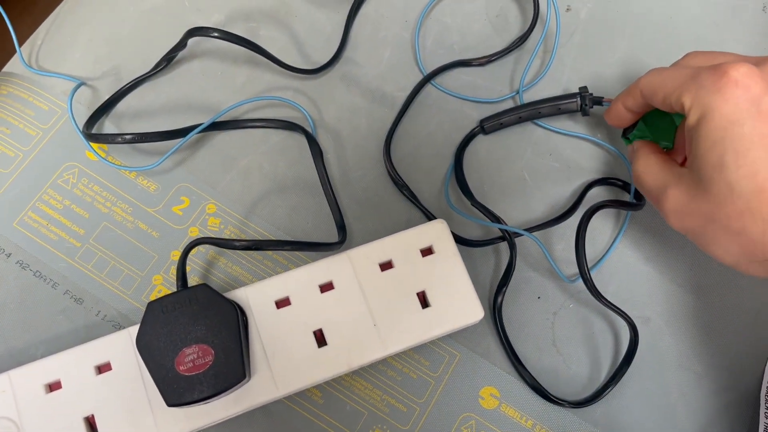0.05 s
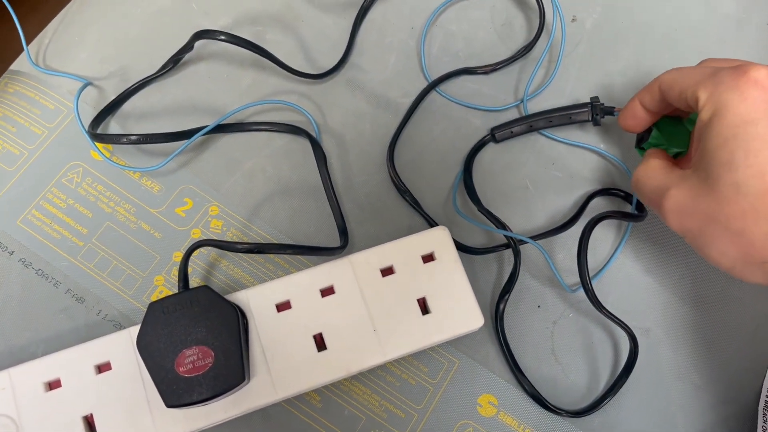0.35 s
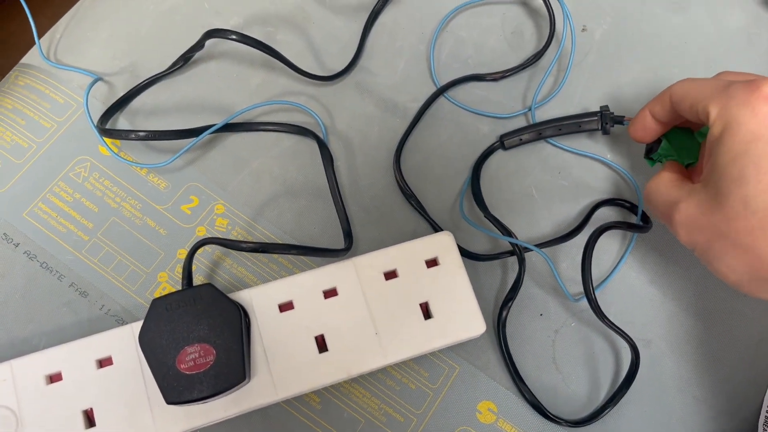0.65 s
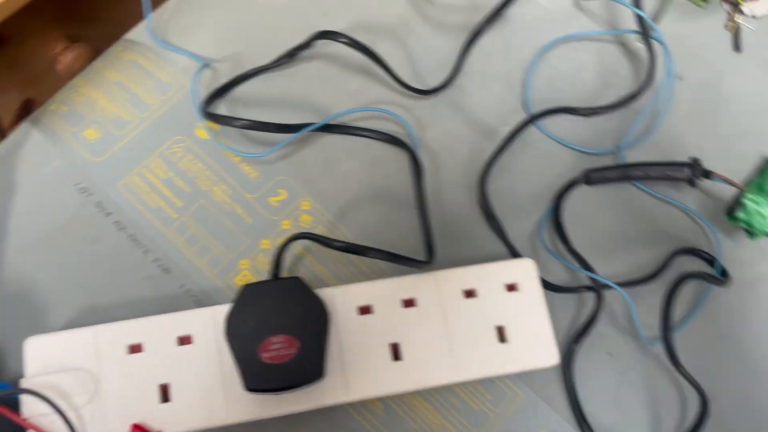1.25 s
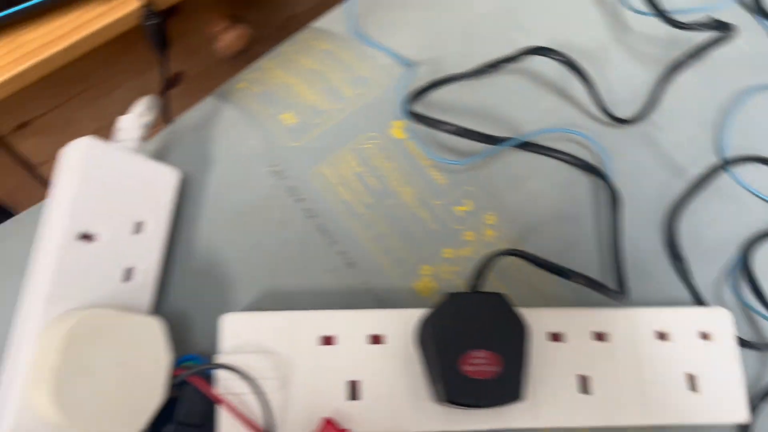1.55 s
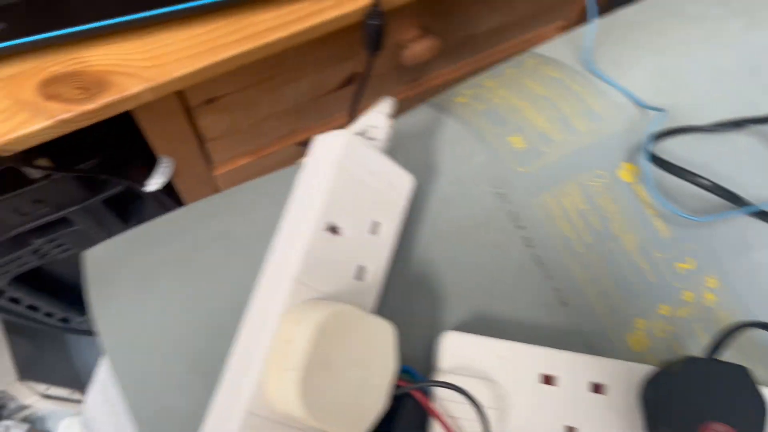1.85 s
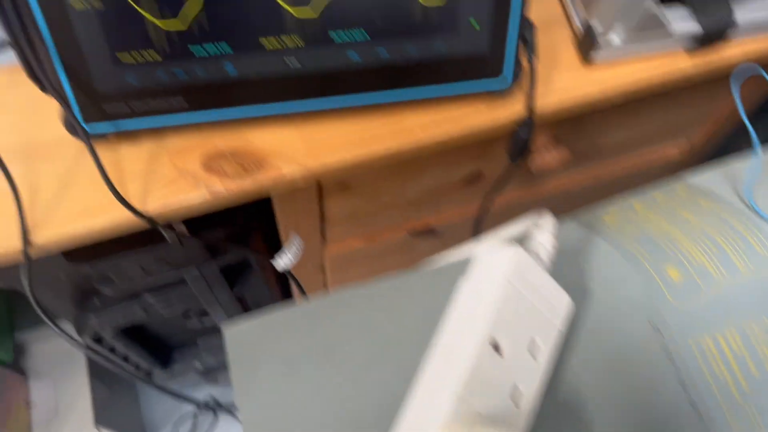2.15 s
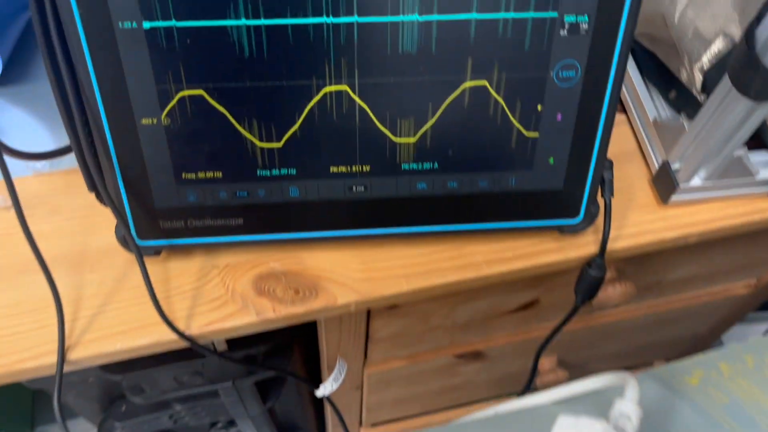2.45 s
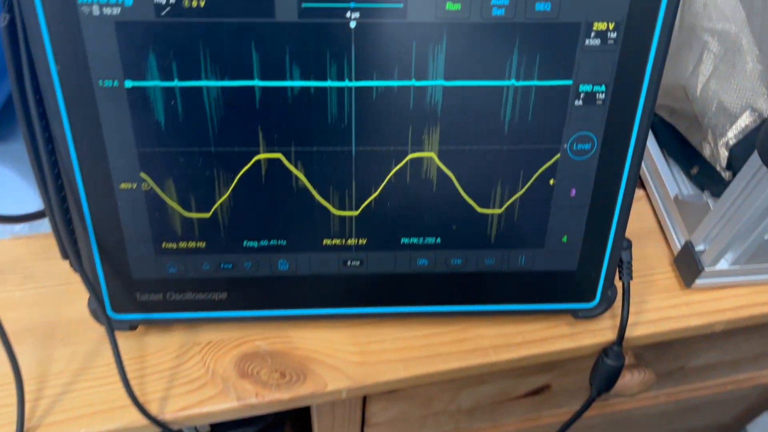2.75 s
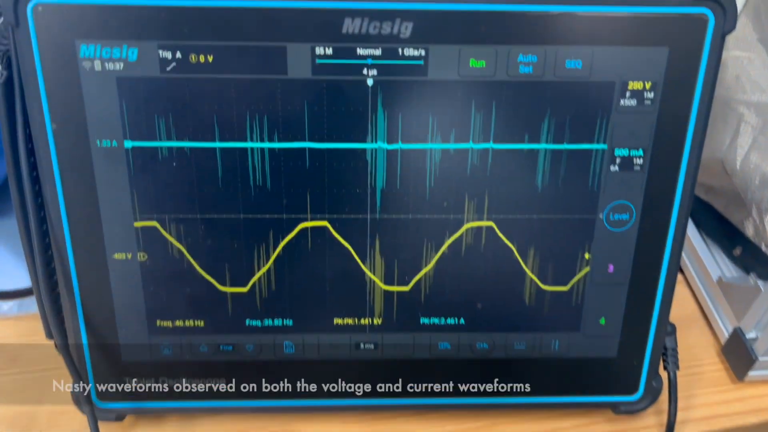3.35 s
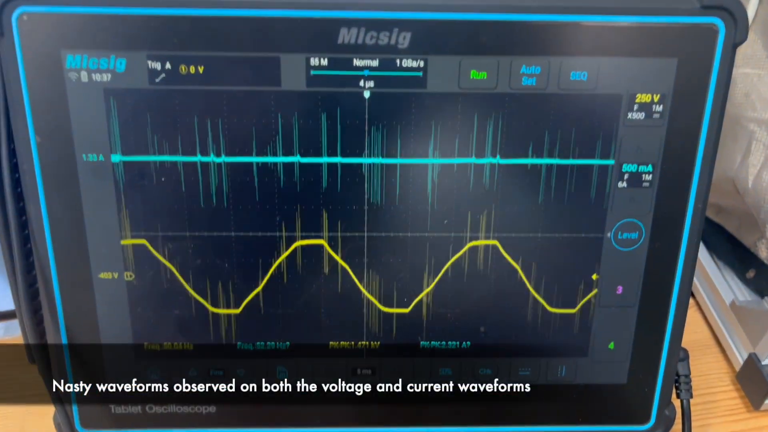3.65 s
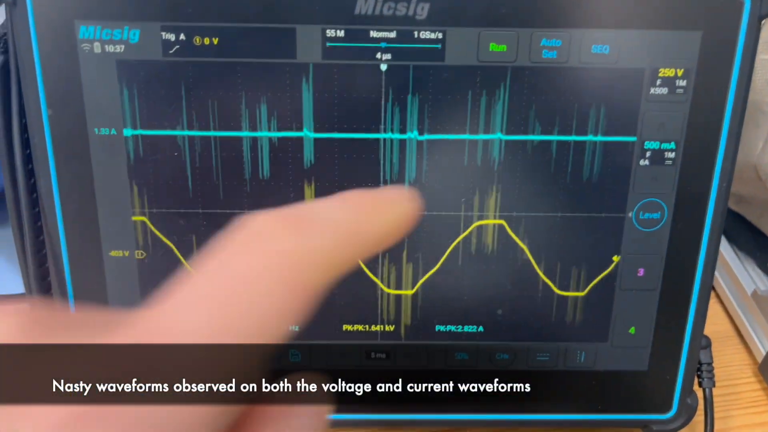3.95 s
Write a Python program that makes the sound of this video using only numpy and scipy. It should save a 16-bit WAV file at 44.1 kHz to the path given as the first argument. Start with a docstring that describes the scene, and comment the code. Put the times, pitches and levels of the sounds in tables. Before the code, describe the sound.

A small relay starts chattering at about 0.5 seconds and continues to the end at 4 seconds: a harsh, rapid buzz of uneven clacks, metallic ringing and high spark crackle. A fan whirs faintly in the small room throughout. A soft low hum and rumble swell around 1 second. The hand-held microphone gets a few barely audible taps, then one clear knock at about 3.5 seconds.

```python
"""A fan whirs faintly in a small room. Then a small mains relay starts to chatter on a workbench:
a hundred times a second its armature (the moving arm) strikes with uneven force and bounces,
clacking in the case and ringing the steel, while the contacts spit sparks. The coil hums over a
low rumble. A hand-held camera takes a light tap, swings away, then gets two more taps and one
clear knock."""
import sys
import numpy as np
from scipy import signal
from scipy.fft import rfft, irfft, next_fast_len
from scipy.io import wavfile
from scipy.ndimage import uniform_filter1d, map_coordinates

SR = 44100
rng = np.random.default_rng(int(sys.argv[2]) if len(sys.argv) > 2 else 0)


def store_pcm(level_fs):
    """Save levels as 16-bit WAV."""
    pcm = np.round(np.clip(level_fs, -1, 1) * 32767).astype(np.int16)
    wavfile.write(sys.argv[1], SR, np.atleast_2d(pcm).T)


N = 176400

# How loud the fan is. Each row: time in seconds, air noise in dB, blade tone in dB.
FAN_LEVELS = [(0, -58, -66.5), (.45, -57.5, -67.5), (1.1, -56.5, -65), (1.45, -59, -62.5),
              (2.2, -55, -62.5), (3.3, -51, -60), (3.65, -59.5, -65.5), (4, -59, -72.5)]
# The air noise's colour (its mix of low and high). Each row: frequency in Hz, relative level in dB.
AIR_TONE = [(25, -26), (55, -25), (90, -26), (230, -10.5), (340, -2.5), (480, 4), (570, -6.5), (680, -10.5),
            (860, -14), (1500, -19.5), (2500, -26.5), (4000, -34), (7000, -49), (15000, -61)]
# How loud the low sounds are. Each row: time in seconds, hum in dB, rumble in dB.
LOW_LEVELS = [(0, -103, -70), (.46, -110, -63.5), (.52, -81, -59), (.8, -62, -60.5), (1.15, -59.5, -54),
              (1.5, -66, -70), (2.2, -68.5, -78), (3.1, -64.5, -70), (3.4, -71.5, -80), (4, -70.5, -84)]
# The rumble's colour. Each row: frequency in Hz, relative level in dB.
RUMBLE_TONE = [(20, -30), (55, -6), (110, -2.5), (170, -6.5), (270, 2), (400, -4.5), (800, -38)]
# The tones in the coil's hum. Each row: frequency in Hz, relative level in dB.
HUM_TONES = [(100, -1), (200, -12), (300, 1)]
# Strikes set one by one. Each row: start in seconds, spark strength in dB, blow strength in dB.
SET_STRIKES = [(0.4791, 6.5, -17), (0.4966, 10, 7.3), (0.5265, 9, 5), (0.588, 7, 2.2), (0.598, 7, 6.3),
               (0.638, 7.5, 8), (0.647, 7, 8), (0.6665, 7, 6.5), (0.6868, 2.2, 0.5), (0.7358, 10, 6.5),
               (0.7459, 8, 8), (0.7859, 9, 7.5), (0.797, 6.5, 5), (0.8378, 0, 6), (0.8454, 5.5, 4),
               (0.8561, 5, 8.5), (0.8655, 4.5, 4.9), (0.8953, 3, 8), (0.906, 3, 6), (0.9164, 8, 2.5),
               (0.9565, 2.1, 6), (1.026, 8.5, 4), (1.0552, 8, 5.5), (1.0671, 3, 5.5), (1.097, 3, 4.4),
               (1.118, 5, 4.5), (1.137, 2.4, 3), (1.1467, 4.2, -1), (1.1768, 10.5, 10.5), (1.2264, 10.5, 2),
               (1.2375, 4.3, 6), (1.2572, -7, 3.0), (1.277, 8, 4), (1.306, -2, 1.5), (1.3257, 7.5, 0),
               (1.3373, -6, 1.5), (1.4658, 7, 8.5), (1.478, 2, -3), (1.496, 3, 4), (1.5055, 2, 2),
               (1.516, 10.5, 7.5), (1.5445, 2, -7), (1.566, 5, 7), (1.5961, 6, 4.5), (1.6054, 9, 3),
               (1.6577, 8.5, 5), (1.696, 3.1, 7.5), (1.7372, 8, 1), (1.7761, 10, 7.5), (1.8159, 5, 8),
               (1.8257, 3, 0), (1.8762, 7.4, -1), (1.9073, 7.5, -2), (1.9371, 9, 5), (1.9675, 8, 2),
               (2.0652, 12.5, 7), (2.0866, 7, -4), (2.098, 4, 3), (2.116, 8, -3), (2.1282, -1, -7),
               (2.145, 12, 5), (2.1576, 3.3, 5), (2.2558, 8, 1.8), (2.2658, 6, 6.5), (2.277, 6.2, 5),
               (2.2867, 7, 8), (2.306, 5, 3.1), (2.3259, 5.6, 3.5), (2.3666, 8, 9), (2.3954, 4, 1),
               (2.4064, 5, 5), (2.4168, 1, 9), (2.436, 5, 1), (2.466, 8.7, 8), (2.5058, 9, 3),
               (2.5175, 6, 6), (2.568, 7, 8), (2.5971, 2.8, 7), (2.606, -1, 2), (2.616, 6.5, 3),
               (2.6258, -1, 0), (2.676, 2, 1.5), (2.6957, 10.5, 4), (2.7468, 8, -1), (2.7663, 3, 7),
               (2.8062, 1, 3), (2.818, 3.0, -1), (2.8969, 4, 0.5), (2.9374, 7, 2), (2.9468, 5.5, 5.5),
               (2.958, -6, 3), (2.9776, 4.0, 4), (3.0262, 9, 4.5), (3.0765, 5, 3.1), (3.0873, 8.5, 5),
               (3.1256, 3.4, 5), (3.1373, 6, 2), (3.1669, 4, 2), (3.1773, 2.6, 3.5), (3.2064, 8, -5),
               (3.2172, 6, 3), (3.298, 7, 3), (3.347, 7, 0), (3.3772, 8, 4.5), (3.387, 10, 3),
               (3.396, -5, 7), (3.4165, 14, 2), (3.4272, 13.5, 6), (3.437, 5, 7), (3.4463, 14, 7.5),
               (3.459, 4.1, 5), (3.4774, 7, 6), (3.4875, -5, 6), (3.5767, 8, 5), (3.6065, 6.5, 4),
               (3.6368, 10.5, 5.5), (3.6477, 7.1, 2), (3.6973, 8, 7), (3.7271, 17.5, 8),
               (3.7772, 11.5, 5.5), (3.8067, 7, 4), (3.8461, 6, 9), (3.8758, 7, 6.8), (3.9064, 5.5, 3.5),
               (3.919, 6, 6), (3.9668, 6, 4), (3.978, -2, 8), (3.9968, 11.5, 9)]
# The bounces after a strike. Each row: delay in seconds, its scatter in seconds, relative level in dB.
REBOUNDS = [(.0023, .0005, -2.5), (.0041, .0006, -4.5)]
# How loud the chatter is. Each row: time in seconds, case clack in dB, spark crackle in dB.
CHATTER_LEVELS = [(.48, -42.5, -33.5), (.85, -42.5, -29), (1, -43, -30.5), (1.15, -42, -29.5),
                  (1.35, -40.5, -27.5), (1.55, -42.5, -27.5), (1.8, -44, -30.5), (2, -45, -31.5),
                  (2.12, -43, -33), (2.21, -49, -36), (2.35, -46, -31.5), (2.7, -45.5, -33.5),
                  (3.1, -47.5, -33.5), (3.42, -49, -36), (3.54, -50.5, -37), (3.66, -49, -37),
                  (4, -53.5, -37.5)]
# How loud the frame's clang is. Each row: time in seconds, level in dB.
CLANG_LEVELS = [(.5, -32.5), (1.35, -35), (1.6, -30), (1.82, -28), (2.15, -35), (2.6, -30.5), (3.4, -34),
                (3.7, -32.5), (4, -34)]
# The colours of case, frame and sparks. Each row: frequency in Hz, relative level in dB.
CASE_TONE = [(100, -23.5), (300, -18), (600, -20.5), (820, -19.5), (1000, -7.5), (1170, -0.5), (1450, 0),
             (1900, -2), (2250, 0.5), (2700, -21.5), (5000, -37.5)]
FRAME_TONE = [(1500, -34), (2250, -24), (2450, 2), (2620, 4), (2830, -0.5), (3020, -2), (3700, -4.5),
              (3920, 5.5), (4400, -1), (4750, -8), (5100, 2), (5450, 3), (5900, -2), (6600, -86),
              (8000, -20.5)]
SPARK_TONE = [(2500, -39), (4300, -16.5), (4800, -3), (5300, -17), (6000, -6.5), (6600, -5.5), (7400, -9.5),
              (9000, -10), (10300, -7), (10950, 0), (11220, 1), (11500, -5.5), (12800, -10.5), (14000, -10),
              (15500, -4)]
# The notes the steel rings at. Each row: frequency in Hz, width in Hz.
STEEL_NOTES = [(3220, 122), (3380, 89), (3570, 100), (4265, 102)]
# How strongly they ring. Each row: time in seconds, then a relative level in dB for each note.
STEEL_LEVELS = [(0.5, -41, -37, -40, -35.5), (0.8, -32, -32, -31, -30), (1, -36.5, -35, -37, -32),
                (1.15, -38.5, -29.5, -36.5, -28), (1.3, -33.5, -32.5, -28.5, -32.5),
                (1.5, -34.5, -28, -31, -30.5), (1.65, -31, -45, -33, -35), (1.8, -28, -34.8, -34, -34.5),
                (2, -34.5, -30.5, -40, -28), (2.12, -32, -32.7, -32.5, -27.5), (2.23, -46, -37, -35, -35.5),
                (2.45, -50, -36, -31.5, -31), (2.751, -44, -33, -31.5, -34),
                (2.95, -43, -39.5, -32.5, -31.5), (3.2, -33.5, -34.5, -34.5, -32.5),
                (3.42, -34, -31.5, -38, -31), (3.55, -33.5, -32, -41.5, -39.5),
                (3.72, -32.5, -34, -41, -37), (3.95, -26.5, -28, -46, -40)]
# The room's echo. Each row: frequency in Hz, seconds to fade by 60 dB (called t60).
ROOM_FADE = [(200, 0.25), (3000, 0.23), (8000, 0.32), (15000, 0.048)]
# Knocks on the camera. Each row: start in seconds, tap strength in dB, thud strength in dB.
CAMERA_KNOCKS = [(.495, -58, -54), (2.55, -43, -50), (3.22, -63, -55), (3.4807, -22, -38)]
# The notes of the camera's shell. Each row: frequency in Hz, relative level in dB, t60 in seconds.
SHELL_NOTES = [(740, 1, 0.016), (1120, 6.5, 0.0045), (1520, 11, 0.0059), (376, -5.5, 0.01),
               (2050, -2, 0.013)]
# How the left and right channels differ. Each row: frequency in Hz, left's lead in radians when near
# and when far, left's level over right in dB when near and when far, likeness from 0 to 1.
LEFT_RIGHT = [(500.0, -0.98, -1.43, 1.27, 0.11, 0.79), (900.0, -0.33, -2.07, 0.04, 1.92, 0.73),
              (1400.0, -0.67, -0.81, 1.25, 6.05, 0.9), (2000.0, 0.13, 0.58, -0.69, -0.84, 0.75),
              (2550.0, 2.25, 2.26, -4.21, -0.7, 0.86), (3200.0, 2.54, 1.86, -1.33, -2.34, 0.59),
              (3380.0, 2.72, 4.89, -0.68, -2.09, 0.62), (3580.0, 9.03, 7.61, -1.46, -0.42, 0.84),
              (3900.0, 8.02, 5.77, -1.81, -1.52, 0.71), (4240.0, 7.16, 6.28, -4.56, -2.86, 0.83),
              (4700.0, 7.32, 6.36, -4.37, -0.09, 0.46), (5300.0, 9.08, 9.08, -1.24, -2.44, 0.76),
              (6300.0, 9.71, 9.52, -0.25, 0.01, 0.97), (7400.0, 10.93, 11.01, 0.27, -0.09, 0.66),
              (8800.0, 12.55, 12.55, -0.43, -0.11, 0.97), (9800.0, 13.07, 12.72, 0.01, -0.04, 0.89),
              (10800.0, 14.18, 14.33, -0.03, 0.03, 0.88), (12000.0, 15.58, 15.66, -0.35, -0.17, 0.97),
              (14000.0, 17.25, 17.3, -0.21, 0.48, 0.77), (15500.0, 18.84, 18.84, -0.26, -0.04, 0.97)]

FAN_HZ = 641.3
START_S, STRIKE_HZ = .4766, 100
USUAL_DB, SCATTER_DB, JITTER_S = -3.5, 3, .0004  # ordinary strikes: strength, its scatter, time scatter
THUD_HZ, THUD_T60_S, THUD_LAG_S = 61, 0.11, 0.0087
SWING_START_S, SWING_END_S = 1.68, 2.6  # the camera moves from near to far
LOW_CUT_HZ, TOP_HZ = 26, 15850


def amp(db):
    return 10 ** (np.asarray(db) / 20)


def unit(x):
    """Scale x to an average (rms) level of 1."""
    return x / np.sqrt(np.mean(x ** 2) + 1e-20)


def steady(x):
    """Hold x near level 1 over every quarter second."""
    power = uniform_filter1d(np.mean(unit(x) ** 2, axis=0), SR // 4)
    return unit(x) / np.sqrt(abs(power) + .01)


def along(points, hz):
    """Read between (Hz, value) points on a log frequency scale."""
    freqs, values = np.transpose(points)
    return np.interp(np.log(hz + 1), np.log(freqs + 1), values)


def curves(rows):
    """Give one value per sample for each column after the time."""
    times, *columns = np.transpose(rows)
    return [np.interp(np.arange(N) / SR, times, column) for column in columns]


def wobble(rate):
    """A smooth random curve through `rate` points a second."""
    return map_coordinates(rng.standard_normal(int(N * rate / SR) + 4), [np.arange(N) * rate / SR])


def filtered(x, response):
    """Multiply each frequency in x by response(hz)."""
    size = next_fast_len(N + SR // 2)
    return irfft(rfft(x, size) * response(np.fft.rfftfreq(size, 1 / SR)), size)[..., :N]


def resonant(x, hz, width, skirt=5):
    """Let x ring at one note; a second, wider peak steepens the sides."""
    peak = lambda f, w: 1j * f * w / (hz * hz - f * f + 1j * f * w)
    return filtered(x, lambda f: peak(f, width) * peak(f, skirt * width))


def rung(x, colour, size=4096):
    """Let x ring a body that has the given colour."""
    cepstrum = irfft(np.log(amp(along(colour, np.fft.rfftfreq(size, 1 / SR)))))
    cepstrum[1:size // 2] *= 2  # fold it so the ringing comes only after each hit
    cepstrum[size // 2 + 1:] = 0
    ringing = irfft(np.exp(rfft(cepstrum)))
    return signal.fftconvolve(x, ringing[None], axes=1)[:, :N]


def fan():
    """A fan makes a soft rush of air and one slightly wavering blade tone."""
    air_db, tone_db = curves(FAN_LEVELS)
    common, apart = filtered(rng.standard_normal((2, N)), lambda hz: amp(along(AIR_TONE, hz)))
    air = unit(np.array([common + 0.98 * apart, common - 0.94 * apart]))
    tone = np.sqrt(2) * np.sin(2 * np.pi * FAN_HZ * np.arange(N) / SR + 0.27 * wobble(3.5))
    return amp(air_db) * air + amp(tone_db + wobble(9.1)) * tone


def rumble_and_hum():
    """A low rumble and the hum of the relay's coil, strongest while the camera is close."""
    t = np.arange(N) / SR
    hum_db, rumble_db = curves(LOW_LEVELS)
    hum = unit(sum(amp(db) * np.sin(2 * np.pi * (hz * t + rng.random())) for hz, db in HUM_TONES))
    common, apart = filtered(rng.standard_normal((2, N)), lambda hz: amp(along(RUMBLE_TONE, hz)))
    rumble = unit(np.array([common + 0.33 * apart, common - 0.035 * apart]))
    return hum * amp(hum_db + 2.2 * wobble(5.0)) + rumble * amp(rumble_db + 3.9 * wobble(12.14))


def strikes():
    """The arm strikes once every half cycle of the mains, with uneven timing and force."""
    starts = np.arange(START_S, N / SR, 1 / STRIKE_HZ)
    timing, force = rng.standard_normal((len(starts), 2)).T
    starts += JITTER_S * timing
    spark_db = USUAL_DB + SCATTER_DB * np.minimum(force, 1.1)
    blow_db = spark_db + 0.95 * rng.standard_normal(len(starts))
    set_s, set_spark_db, set_blow_db = np.transpose(SET_STRIKES)
    nearest = np.clip(np.round((set_s - START_S) * STRIKE_HZ).astype(int), 0, len(starts) - 1)
    starts[nearest], spark_db[nearest], blow_db[nearest] = set_s, set_spark_db, set_blow_db
    return starts, spark_db, blow_db


def clicks(starts, db, bounce_db, bounce_follows, spread_s, grain_db, count=24):
    """Each strike and bounce is a tight cluster of tiny clicks, mostly within a millisecond or two."""
    times, levels = [starts], [db]
    for delay, scatter, level in REBOUNDS:
        times.append(starts + delay + scatter * rng.standard_normal(len(starts)))
        levels.append(bounce_follows * db + level + bounce_db + 2 * rng.standard_normal(len(starts)))
    times, levels = np.concatenate(times), np.concatenate(levels)
    at = ((times[:, None] + spread_s * rng.gamma(2, size=(len(times), count))) * SR).astype(int)
    sizes = amp(grain_db * rng.standard_normal(at.shape))
    sizes *= (amp(levels) / np.linalg.norm(sizes, axis=1))[:, None]
    sides = [sizes * rng.choice([-1, 1], at.shape) for _ in range(2)]  # two unrelated signals
    return np.array([np.bincount(at.ravel(), side.ravel(), N)[:N] for side in sides])


def echoes(x, bench_db, bench_t60, room_db, count=5):
    """Add quick echoes from the bench and the room's longer tail; both change as the camera moves."""
    out, t = x.copy(), np.arange(SR // 4) / SR
    for k in range(count):
        hz, times, noise = signal.stft(rng.standard_normal((2, len(t))), SR, nperseg=256)
        fade = amp(-60 * times / along(ROOM_FADE, hz)[:, None])
        tail = signal.istft(noise * fade, SR, nperseg=256)[1][:, :len(t)]
        bench = rng.standard_normal((2, len(t))) * amp(-60 * t / bench_t60)
        echo = (amp(room_db) * unit(tail) + amp(bench_db) * unit(bench)) / np.sqrt(len(t))
        share = np.sqrt(np.clip(1 - abs(np.linspace(0, count - 1, N) - k), 0, 1))  # blend into the next
        out += signal.fftconvolve(x * share, echo, axes=1)[:, :N]
    return out


def clack(blows):
    """Each blow makes the case clack and the frame clang briefly."""
    case_db, _ = curves(CHATTER_LEVELS)
    frame_db, = curves(CLANG_LEVELS)
    blows = echoes(blows, bench_db=-8, bench_t60=.016, room_db=-8)
    return amp(case_db) * unit(rung(blows, CASE_TONE)) + amp(frame_db) * unit(rung(blows, FRAME_TONE))


def steel_ring(jolts):
    """Sharp jolts set the steel ringing at four notes."""
    jolts = echoes(jolts, bench_db=-9, bench_t60=.008, room_db=-5)
    return sum(amp(db - 0.75) * steady(resonant(jolts, hz, width))
               for (hz, width), db in zip(STEEL_NOTES, curves(STEEL_LEVELS)))


def crackle(sparks):
    """Sparks at the contacts make a high crackle."""
    _, crackle_db = curves(CHATTER_LEVELS)
    sparks = echoes(sparks, bench_db=-5, bench_t60=.018, room_db=-5.5)
    return amp(crackle_db) * unit(rung(sparks, SPARK_TONE))


def relay():
    """The same strikes clack in the case, ring the steel and draw sparks."""
    starts, spark_db, blow_db = strikes()
    blows = clicks(starts, blow_db, bounce_db=2, bounce_follows=0.4, spread_s=.0004, grain_db=6)
    jolt_s = starts + .001 + .0005 * rng.standard_normal(len(starts))
    jolts = clicks(jolt_s, 0.47 * blow_db, bounce_db=2, bounce_follows=0.31, spread_s=.0001,
                   grain_db=6.5, count=2)
    sparks = clicks(starts, spark_db, bounce_db=1.5, bounce_follows=0.28, spread_s=.00055, grain_db=3.5)
    return clack(blows) + steel_ring(jolts) + crackle(sparks)


def knocks():
    """A finger taps the camera's shell, and a low thud follows."""
    out, t = np.zeros(N + SR), np.arange(SR // 4) / SR
    shell = sum((-1) ** k * amp(db - 60 * t / t60) * np.sin(2 * np.pi * hz * t)
                for k, (hz, db, t60) in enumerate(SHELL_NOTES))
    tap = shell * (1 - np.exp(-t / 0.0012))  # soften the start
    punch = 2.04 * np.sin(2 * np.pi * 140 * t) * np.exp(-t / 0.0059)
    thud = amp(-60 * t / THUD_T60_S) * (np.sin(2 * np.pi * THUD_HZ * t) + punch)
    for start, tap_db, thud_db in CAMERA_KNOCKS:
        out[round(start * SR):][:len(t)] += amp(tap_db) * tap
        out[round((start + THUD_LAG_S) * SR):][:len(t)] += amp(thud_db) * thud
    return out[:N]


def stereo(pair):
    """Mix two unrelated signals into left and right; timing and balance shift as the camera swings."""
    hz, times, (first, second) = signal.stft(pair, SR, nperseg=1024)
    lead, lead_far, pan, pan_far, alike = [along(np.array(LEFT_RIGHT)[:, [0, k]], hz)[:, None]
                                           for k in range(1, 6)]
    away = np.interp(times, [SWING_START_S, SWING_END_S], [0, 1])
    balance = amp((pan + away * (pan_far - pan)) / 2)
    tilt = balance * np.exp(.5j * (lead + away * (lead_far - lead)))
    angle = np.arccos(np.clip(alike, 0, 1)) / 2
    common, apart = np.cos(angle) * first, np.sin(angle) * second
    left, right = (common + apart) * tilt, (common - apart) / tilt
    return signal.istft(np.array([left, right]), SR, nperseg=1024)[1][:, :N]


def scene():
    return stereo(relay()) + rumble_and_hum() + fan() + knocks()


def record(dry):
    """The camera thins the deepest bass and cuts off the highest treble."""
    bass_cut = lambda hz: (1j * hz / (LOW_CUT_HZ + 1j * hz)) ** 2
    treble_cut = lambda hz: np.clip((TOP_HZ - hz) / 300 + .5, 0, 1)
    return filtered(dry, lambda hz: bass_cut(hz) * treble_cut(hz))


dry = scene()
out = record(dry)
store_pcm(out)
```